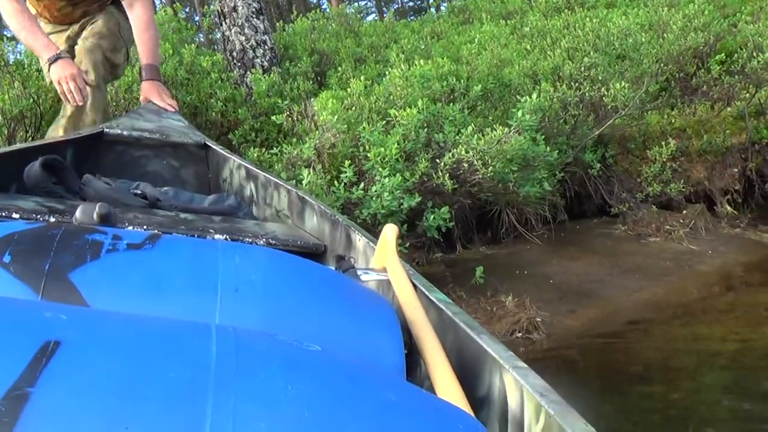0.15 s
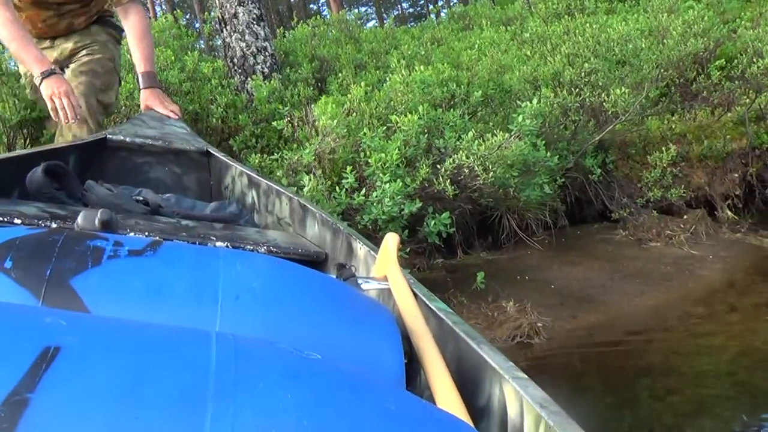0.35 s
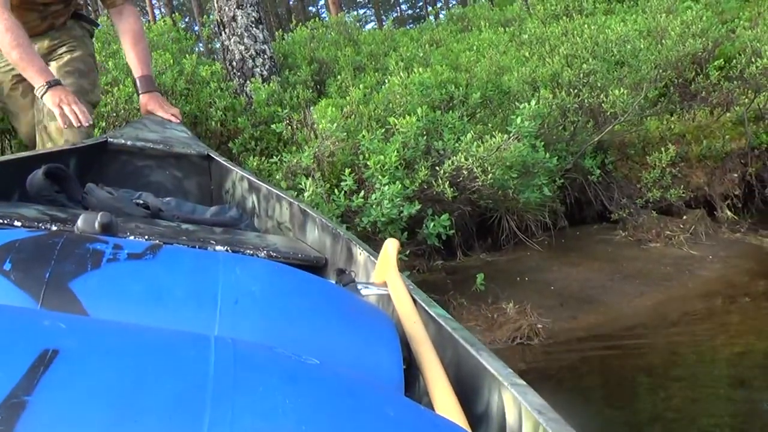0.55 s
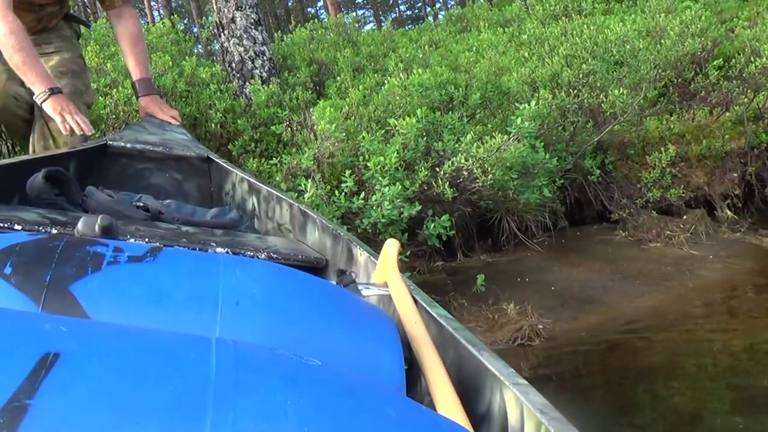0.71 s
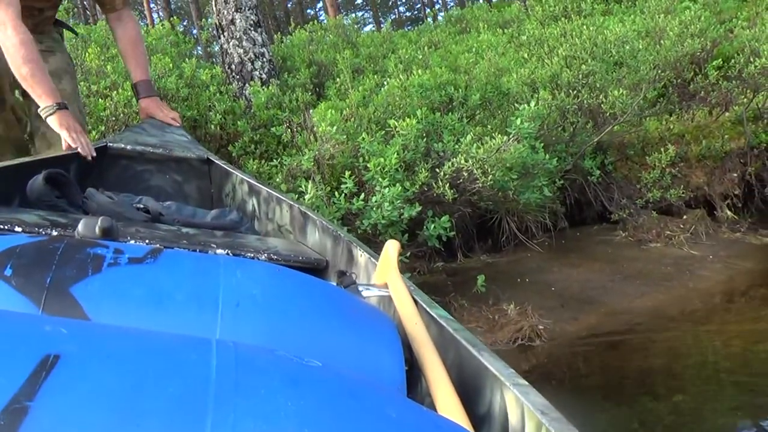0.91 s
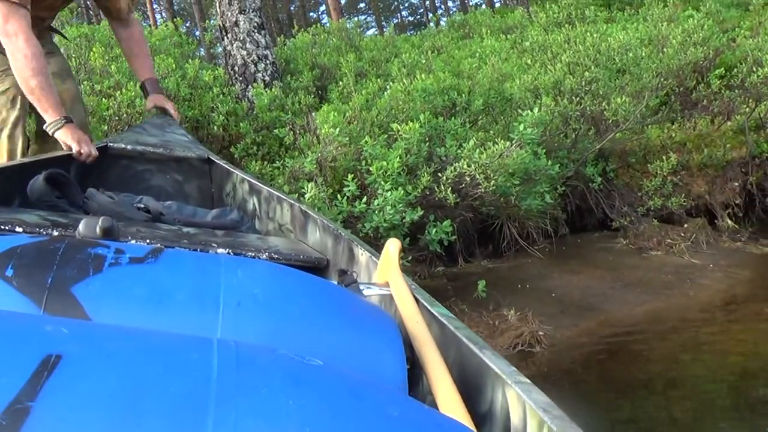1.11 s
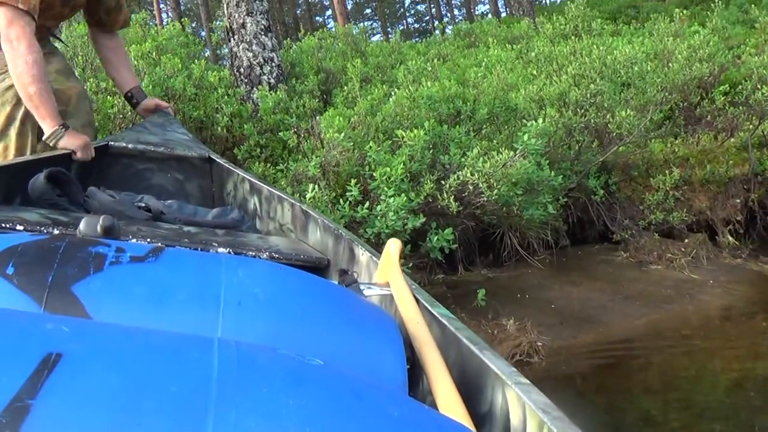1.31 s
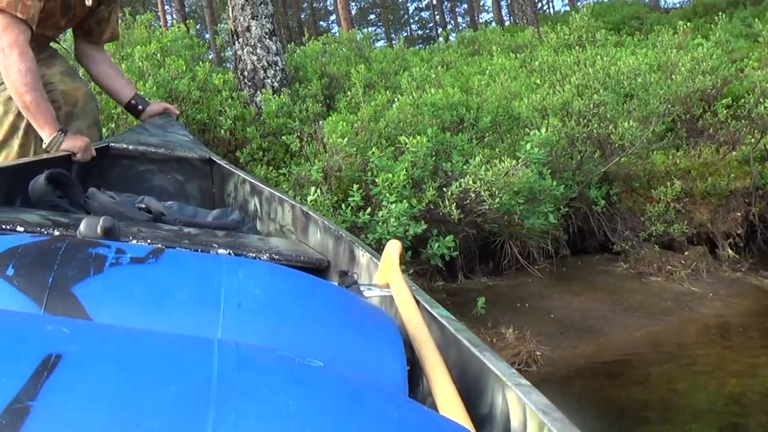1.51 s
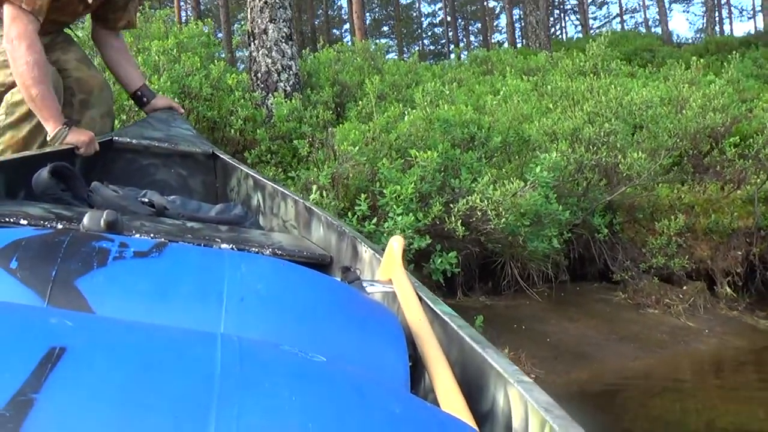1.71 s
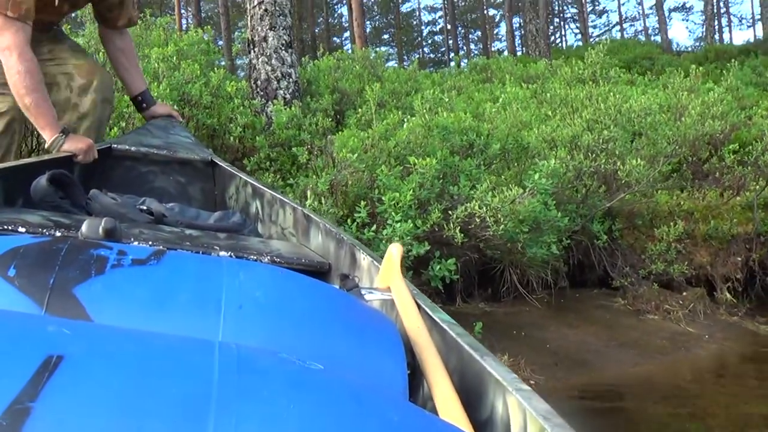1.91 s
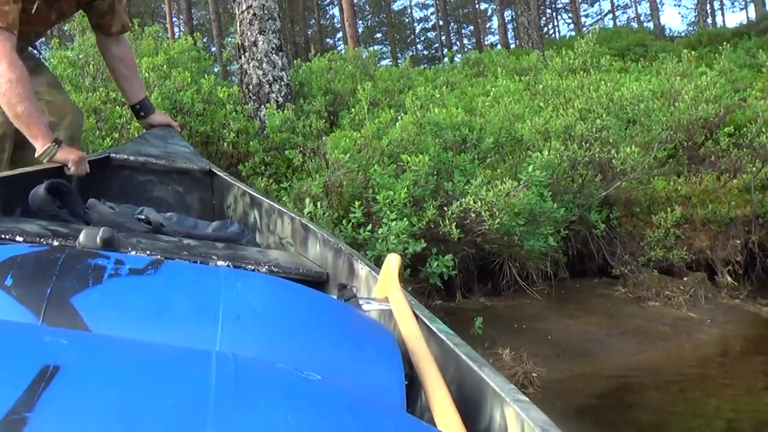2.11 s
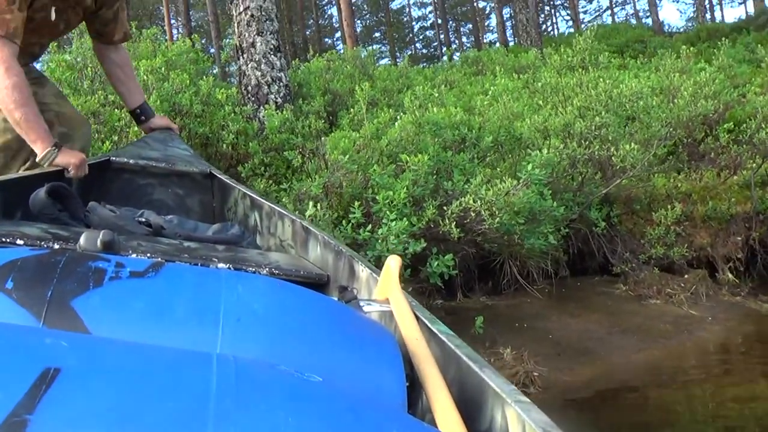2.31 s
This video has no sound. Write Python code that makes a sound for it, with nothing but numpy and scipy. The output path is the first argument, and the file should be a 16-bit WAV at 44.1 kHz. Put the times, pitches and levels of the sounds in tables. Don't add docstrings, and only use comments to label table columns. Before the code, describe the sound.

Canoe hull knocks hard twice against a grassy bank, with twig scratches and soft dragging

```python
import sys
import numpy as np
from scipy import signal
from scipy.fft import rfft, irfft, next_fast_len
from scipy.io import wavfile
from scipy.ndimage import uniform_filter1d

SR = 44100
rng = np.random.default_rng(int(sys.argv[2]) if len(sys.argv) > 2 else 0)


def volts_from_decibels(level):
    exponent = np.asarray(level, float) / 20
    return 10 ** exponent


def wav_record(signal):
    frames = np.transpose(np.atleast_2d(signal))
    bounded = np.clip(frames, -1, 1)
    quanta = np.round(bounded * 32767).astype(np.int16)
    wavfile.write(sys.argv[1], SR, quanta)


N = 105840


def read_db(table, hz):
    points = np.array(table, float)
    return np.interp(np.log(hz), np.log(points[:, 0]), points[:, 1])


def colour(x, table):
    size = next_fast_len(N + 4096)
    hz = np.maximum(np.arange(size // 2 + 1) * SR / size, 1)
    return irfft(rfft(x, size) * volts_from_decibels(read_db(table, hz)), size)[:N]


def bandpass(x, low_hz, high_hz):
    return signal.sosfilt(signal.butter(1, [low_hz, high_hz], "band", fs=SR, output="sos"), x)


def unit(x):
    return x / np.sqrt(np.mean(x ** 2))


def walk(rate_hz):
    hold = int(SR / rate_hz)
    steps = np.repeat(rng.standard_normal(N // hold + 1), hold)
    return 1.3 * uniform_filter1d(uniform_filter1d(steps, hold), hold)[:N]


def grains(rate_per_s, scatter_db):
    hit = rng.random(N) < rate_per_s / SR
    size = volts_from_decibels(scatter_db * np.minimum(rng.exponential(size=N), 2))
    return unit(hit * rng.standard_normal(N) * size)


def ring(modes, signs):
    spread_cycles = 0.6
    t = np.arange(SR // 3)[:, None] / SR
    hz, db, t60_s = np.array(modes, float).T
    bloom = 1 - np.exp(-t * hz / spread_cycles)
    decay = np.exp(-np.log(1000) * t / t60_s)
    return (np.sin(2 * np.pi * hz * t) * bloom * decay * volts_from_decibels(db) * signs).sum(axis=1)


def contact_push(blows):
    push = np.zeros(N + SR)
    for start_s, db, contact_ms in blows:
        width, start = contact_ms * SR / 4000, start_s * SR
        i = np.arange(int(start), int(start + 10 * width) + 2)
        push[i] += volts_from_decibels(db) * np.exp(-np.abs(i - start) / width) / width / 2
    return push[:N]


# (frequency [Hz], t60 [s])
CROWD_T60 = [(80, 0.52), (300, 0.22), (800, 0.24), (1500, 0.13), (2500, 0.083), (4000, 0.078), (7000, 0.03),
             (12000, 0.016)]


def panel(blows, modes, slap, crowd, crowd_db):
    hz = 80 + 12000 * ((np.arange(360) + rng.random(360)) / 360) ** 2
    level_db = read_db(crowd, hz) + crowd_db + 10 * np.log10(hz / 400)
    lesser = np.array([hz, level_db, read_db(CROWD_T60, hz)]).T
    signs = np.tanh(2 * rng.standard_normal(len(hz)))
    body = ring(lesser, signs) - ring(modes, 0.96) - ring(slap, 0.99)
    return signal.fftconvolve(contact_push(blows), body)[:N]


# (time [s], level [dB], contact [ms])
BOW_BLOWS = [(.2000, -35.5, 0.84), (.2022, -30.5, 0.8), (.2043, -17.5, 0.49), (.2105, -31, 1.1),
             (.2150, -43, 2), (.2215, -45, 0.9), (.2262, -50, 2), (.2480, -28, 2.9), (.2620, -30.5, 2.3),
             (.3200, -39, 1.5), (.5150, -44.5, 2.3), (.7650, -52, 3.2), (.7850, -39, 9.3),
             (.7600, -25.5, 19), (1.105, -45, 7.9), (2.170, -34.5, 16)]
# (frequency [Hz], level [dB], t60 [s])
BOW_MODES = [(111, -7, 0.18), (197.4, -6, 0.34), (246, 1, 0.14), (326, -13, 0.087), (404.6, 7, 0.1),
             (80, -20, 0.13), (500, 11, 0.031), (854.5, 3, 0.12), (902, -2, 0.11), (1006, -8.5, 0.18),
             (1257, -1, 0.16), (1330, -11, 0.1), (1520, -17, 0.058), (1945, 3, 0.044)]
# (frequency [Hz], level [dB], t60 [s])
BOW_SLAP = [(581, 19.6, 0.011), (1700, 11.6, 0.0069)]
# (frequency [Hz], level [dB])
BOW_CROWD = [(80, -19), (200, -1.5), (450, -6.5), (1000, -11), (1800, -4.5), (3500, -12.5), (6000, -25),
             (12000, -39)]


def bow_blow():
    return panel(BOW_BLOWS, BOW_MODES, BOW_SLAP, BOW_CROWD, crowd_db=-6)


# (time [s], level [dB], contact [ms])
FLANK_BLOWS = [(1.6450, -49.5, 0.2), (1.7800, -45, 0.53), (1.8250, -45, 1.1), (1.8940, -48.5, 0.29),
               (1.9268, -45, 0.34), (1.9295, -36, 0.62), (1.9322, -19.5, 0.67), (1.9375, -44, 1.5),
               (1.9400, -41, 1.2), (1.9452, -28, 2.2), (1.9485, -37.5, 4.3), (2.0070, -40.5, 1.2),
               (2.0920, -41.5, 0.54), (2.1080, -44.5, 0.67), (2.3350, -50, 0.14)]
# (frequency [Hz], level [dB], t60 [s])
FLANK_MODES = [(103.5, -11, 0.69), (185, -17, 0.33), (242.2, -2, 0.19), (296, -1.5, 0.14), (384, -15, 0.18),
               (467, -11, 0.13), (534, 5.5, 0.071), (611, -9, 0.094), (771, -15, 0.21), (1350, -15, 0.07),
               (1790, -20, 0.05), (2040, -9.5, 0.092), (2210, -6, 0.026)]
# (frequency [Hz], level [dB], t60 [s])
FLANK_SLAP = [(427, 21.4, 0.015), (950, 10.3, 0.02), (1920, 6, 0.01)]
# (frequency [Hz], level [dB])
FLANK_CROWD = [(80, -42), (200, -4.5), (450, 0), (1000, -19), (2000, -9.5), (3500, -13), (6000, -18.5),
               (12000, -29)]


def flank_blow():
    return panel(FLANK_BLOWS, FLANK_MODES, FLANK_SLAP, FLANK_CROWD, crowd_db=-4.5)


# (time [s], rise [s], fall [s], level [dB], centre [Hz])
SCRATCHES = [(0.0, 0.0043, 0.09, -50.5, 7300), (.06, 0.017, 0.019, -50.5, 7000),
             (0.256, 0.061, 0.053, -39.5, 5400), (0.7366, 0.001, 0.006, -27.5, 4900),
             (0.737, 0.0037, 0.014, -26.5, 7450), (0.743, 0.0074, 0.049, -35, 1940),
             (.785, 0.011, 0.02, -46, 8000), (.98, 0.024, 0.013, -52, 8200),
             (1.04, 0.02, 0.076, -45.5, 3650), (1.093, 0.013, 0.1, -42, 1260),
             (1.108, 0.031, 0.029, -47, 8750), (1.294, 0.0081, 0.042, -50, 3840),
             (1.53, 0.0063, 0.0095, -51.5, 8000), (1.604, 0.0063, 0.016, -53, 9000),
             (1.641, 0.00092, 0.01, -44, 4500), (1.653, 0.0052, 0.043, -51, 2980),
             (1.683, 0.0068, 0.037, -51.5, 3230), (1.775, 0.00079, 0.007, -45.5, 3000),
             (1.785, 0.0018, 0.0092, -45.5, 4000), (1.792, .004, 0.0093, -46.5, 4800),
             (1.8203, 0.0015, 0.017, -49, 4000), (1.8828, 0.001, 0.019, -42, 8600),
             (1.698, .002, 0.013, -59, 4000), (.45, 0.0047, 0.019, -52.5, 6000),
             (1.93, 0.0027, 0.0099, -36, 5560), (2.092, 0.037, 0.07, -41.5, 6700),
             (2.265, 0.019, 0.08, -51.5, 8850), (2.318, 0.011, 0.071, -48, 4100),
             (0.204, 0.004, 0.021, -41.5, 3000), (1.887, 0.0043, 0.017, -46, 1780)]


def scratches():
    width, top_hz, thud_hz = 1.56, 13200, 1010
    rough = grains(10000, scatter_db=-1.5) + 0.51 * rng.standard_normal(N)
    swarm = unit(rough * volts_from_decibels(1.2 * walk(300)))
    thud = bandpass(swarm, thud_hz / 4, thud_hz * 2)
    out, t = np.zeros(N), np.arange(N) / SR
    for start_s, rise_s, fall_s, db, hz in SCRATCHES:
        a = int(start_s * SR)
        b = min(int((start_s + rise_s + 2 * fall_s) * SR) + 400, N)
        age = t[a:b] - start_s
        swell = np.sin(np.pi / 2 * age / rise_s) ** 2
        die = np.exp(-np.abs((age - rise_s) / fall_s) ** 1.5 * 3)
        shape = np.where(age < rise_s, swell, die)
        skin = bandpass(swarm[a:b] * shape, hz / (1 + width), min(hz * (1 + width), top_hz))
        out[a:b] += volts_from_decibels(db) * (skin + thud[a:b] * shape)
    return out


# (time [s], level [dB], pitch [Hz], t60 [s])
TWIGS = [(.3195, -37, 6200, .01), (.3270, -37, 2070, .04), (.7360, -32, 4170, .004),
         (.7412, -25, 10300, .003), (.7425, -26, 7320, .007), (.7445, -29, 3400, .007),
         (1.0710, -45, 2900, .01), (1.1160, -42, 1400, .012), (1.1330, -46, 6600, .006),
         (1.2995, -47, 2790, .012), (1.5350, -48, 1940, .01), (1.6420, -40, 2200, .005),
         (1.6430, -43, 5630, .007), (1.7755, -42, 2800, .005), (1.7940, -44, 3500, .005),
         (1.8215, -42, 2380, .006), (1.8829, -30, 8600, .005), (1.8840, -36, 3320, .006),
         (1.8920, -33, 1550, .016), (1.8990, -39, 1440, .008), (1.9050, -42, 1900, .006),
         (2.0120, -45, 1990, .015), (2.1850, -47, 1630, .02)]


def twigs():
    out = np.zeros(N + SR)
    for start_s, db, hz, t60_s in TWIGS:
        chatter = rng.standard_normal(260) * np.linspace(1, 0, 260)
        sound = signal.fftconvolve(chatter, ring([(hz, 0, t60_s)], 1)[:4000])
        start = int(start_s * SR)
        out[start:start + len(sound)] += sound * volts_from_decibels(db) / np.abs(sound).max()
    return out[:N]


# (time [s], keel drag level [dB], grass brushing level [dB])
DRAG = [(0.0, -52.5, -59), (0.39, -52.5, -63), (0.58, -51, -53.5), (0.75, -57.5, -49), (0.95, -56.5, -52.5),
        (1.22, -54, -59.5), (1.34, -57.5, -62), (1.61, -53.5, -70.5), (1.82, -52, -60),
        (1.97, -49.5, -56.5), (2.17, -51.5, -63), (2.4, -56.5, -60)]


def drag_levels_db():
    t, points = np.arange(N) / SR, np.array(DRAG)
    return [np.interp(t, points[:, 0], points[:, k]) for k in (1, 2)]


# (frequency [Hz], density [dB per Hz])
KEEL = [(30, 2.5), (100, -2.5), (250, -3.5), (420, -2.5), (800, -6.5), (1600, -10), (3000, -15.5),
        (7000, -24)]


def keel(db):
    bumps = grains(4000, scatter_db=-1.6) * volts_from_decibels(0.85 * walk(8.43) + 3.2 * walk(43.77))
    bumps = bumps + 1.2 * rng.standard_normal(N)
    return unit(colour(bumps, KEEL)) * volts_from_decibels(db)


# (frequency [Hz], density [dB per Hz])
GRASS = [(900, -6), (2000, -2.5), (4000, -5.5), (7000, -2.5), (10500, 0.5), (14500, -4)]


def grass(db):
    blades = grains(6000, scatter_db=-0.5) * volts_from_decibels(0.5 * walk(25.8))
    blades = blades + 0.54 * rng.standard_normal(N)
    return unit(colour(blades, [(700, 2.25), *GRASS])) * volts_from_decibels(db)


# (frequency [Hz], density [dB per Hz])
AIR = [(30, 16.5), (150, -3), (500, 3.5), (1500, 2.5), (4000, -15.5), (9000, -22), (14500, -50)]


def air():
    return unit(colour(rng.standard_normal(N), AIR)) * volts_from_decibels(-55)


# (frequency [Hz], gain [dB])
HULL_SIDE = [(60, -2), (150, -3.5), (250, -5.5), (400, -8.5), (700, -16), (2000, -17.5), (3000, -18.5),
             (12000, -23)]
# (frequency [Hz], gain [dB])
LOOSE_SIDE = [(40, -8), (300, -12), (1000, -18.5), (2200, -21), (4500, -20.5), (5800, -10.5), (8500, -12.5),
              (14000, -13)]


def scene():
    keel_db, grass_db = drag_levels_db()
    hits = bow_blow() + flank_blow() + scratches() + twigs()
    bed = keel(keel_db + 3.15) + grass(grass_db + 0.45) + air()
    loose = keel(keel_db + 0.67) + grass(grass_db + 0.36) + air() + 0.94 * scratches()
    mid = hits + bed
    side = colour(hits + 0.7 * bed, HULL_SIDE) + colour(loose, LOOSE_SIDE)
    return np.array([mid + side, mid - side])


# (frequency [Hz], gain [dB])
MIX_TONE = [(20, -25), (55, -14), (120, 0), (12500, 0), (14400, -4), (14500, -24), (15500, -26),
            (15700, -70)]


def mix_tone(dry):
    return np.array([colour(x, MIX_TONE) for x in dry])


def roll_off(x):
    return signal.sosfilt(signal.butter(12, 15630, fs=SR, output="sos"), x)


def record(dry):
    mix = mix_tone(dry)
    return roll_off(mix)


dry = scene()
out = record(dry)
wav_record(out)
```